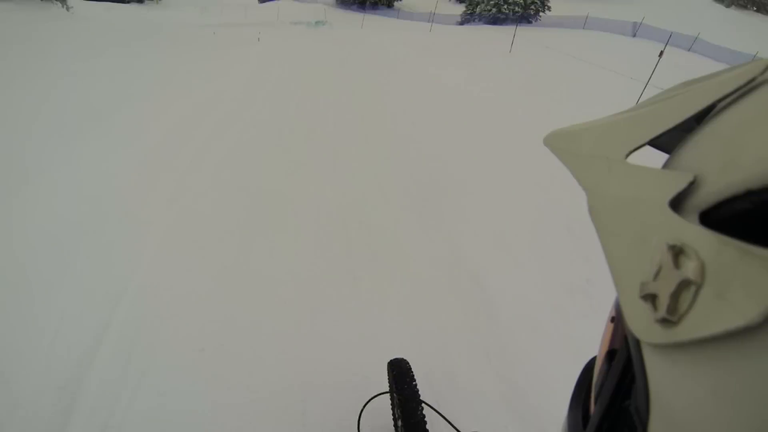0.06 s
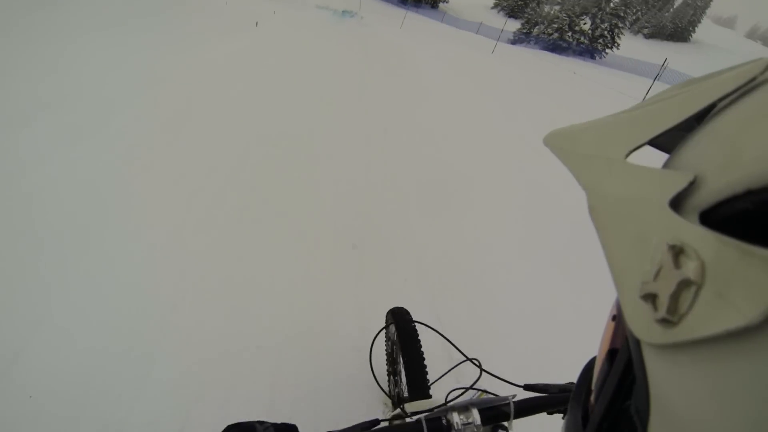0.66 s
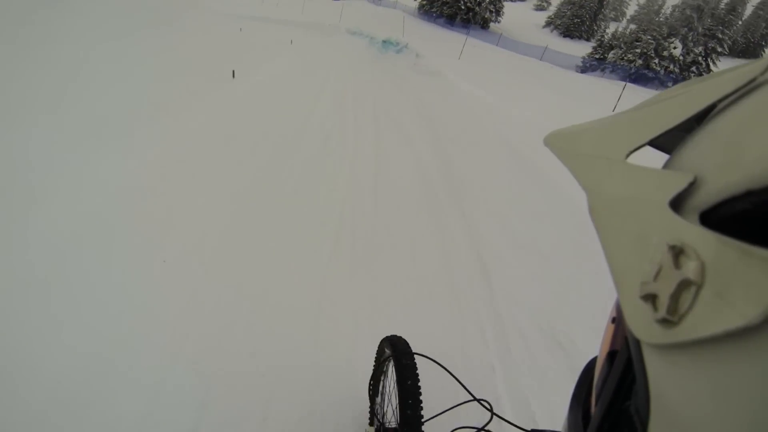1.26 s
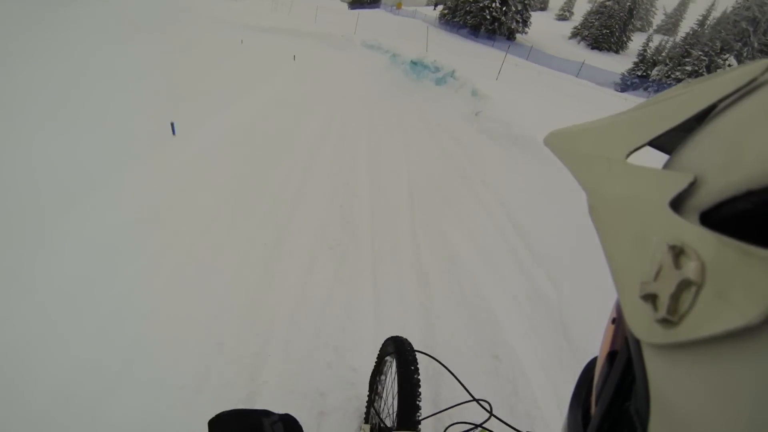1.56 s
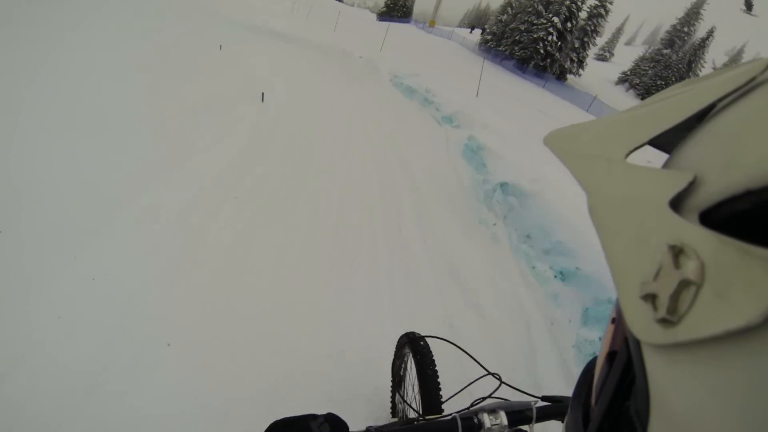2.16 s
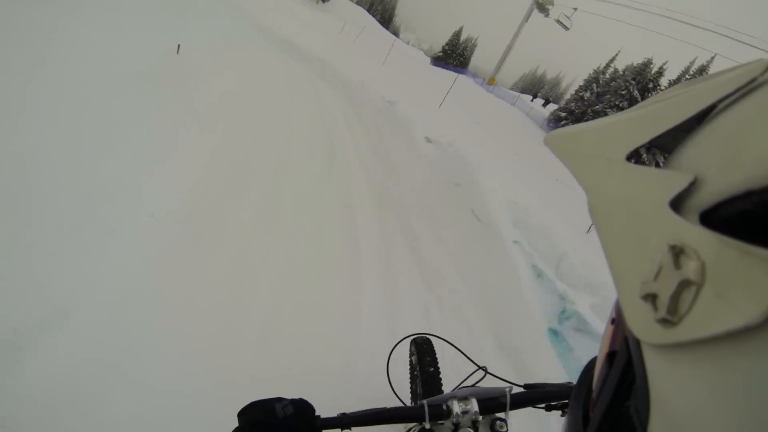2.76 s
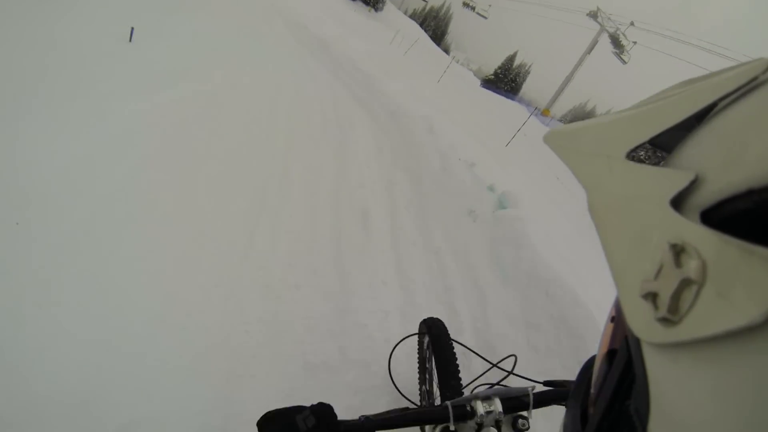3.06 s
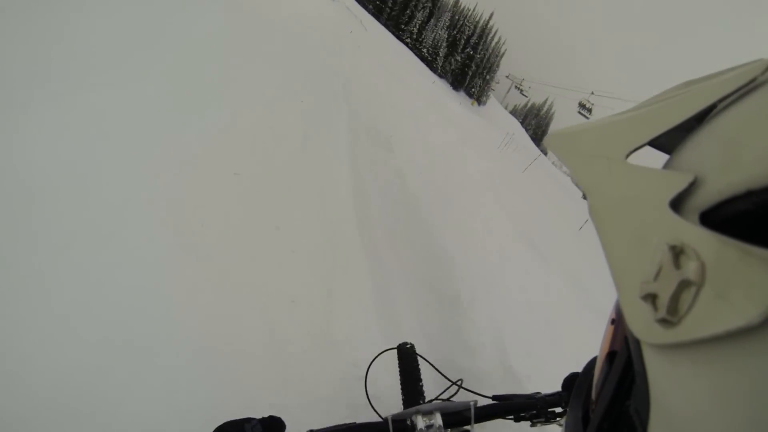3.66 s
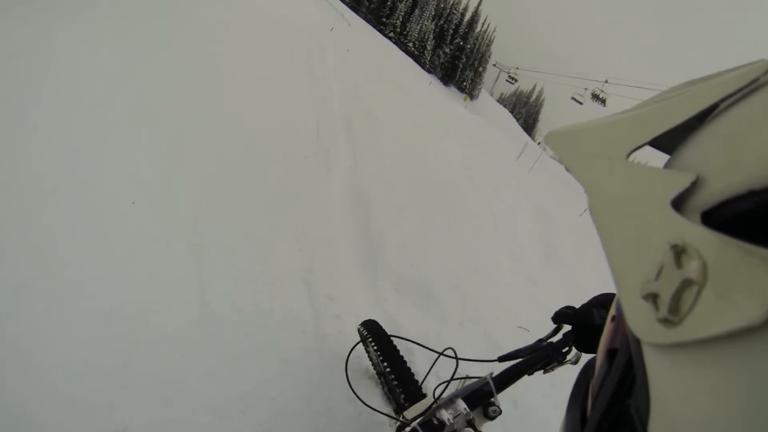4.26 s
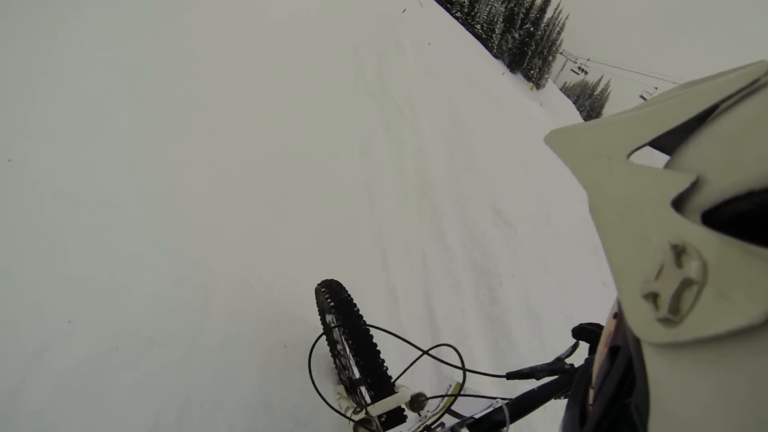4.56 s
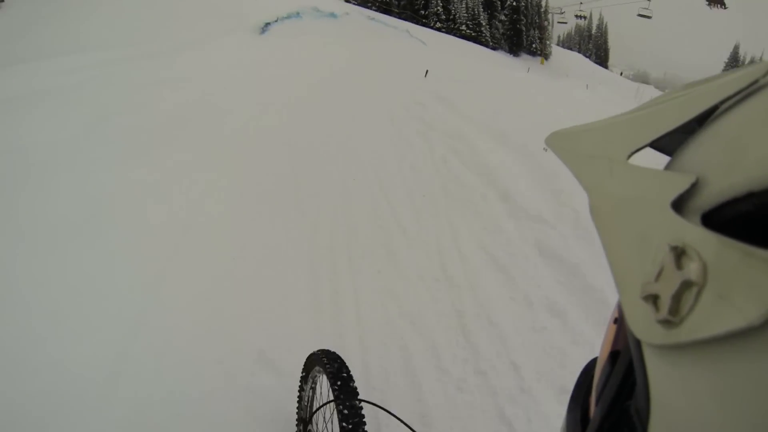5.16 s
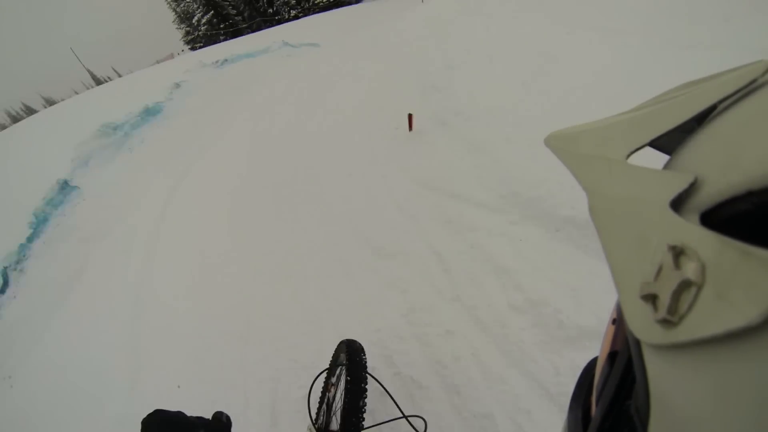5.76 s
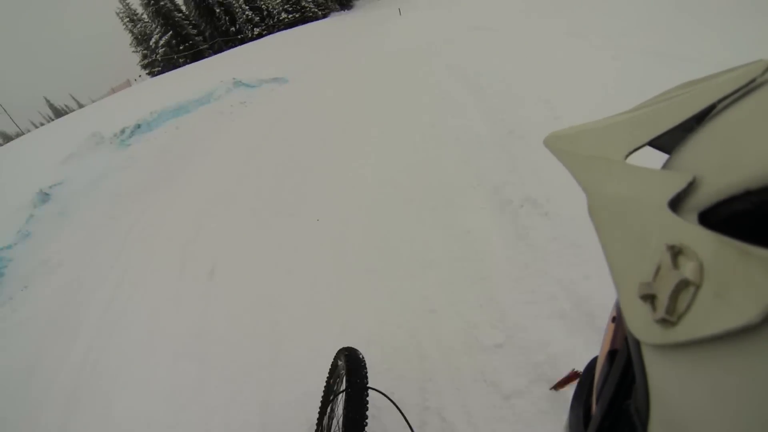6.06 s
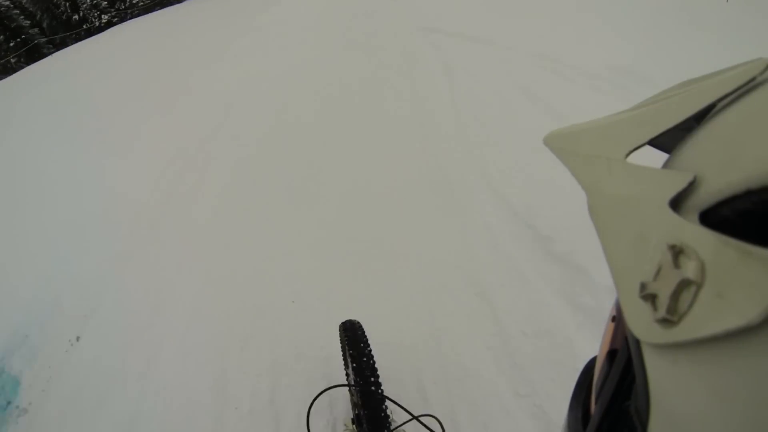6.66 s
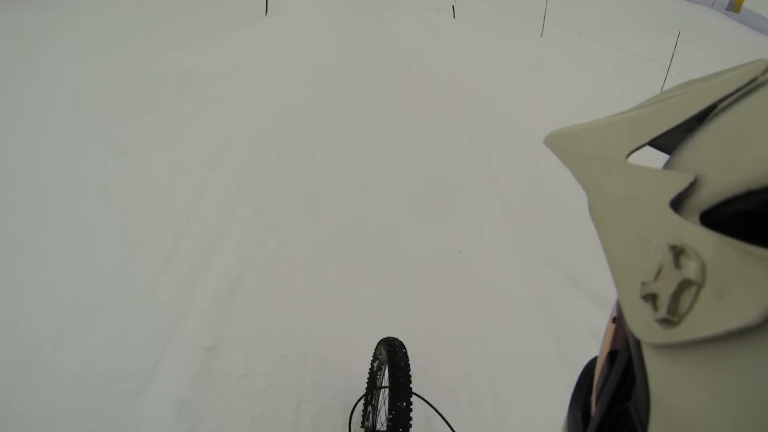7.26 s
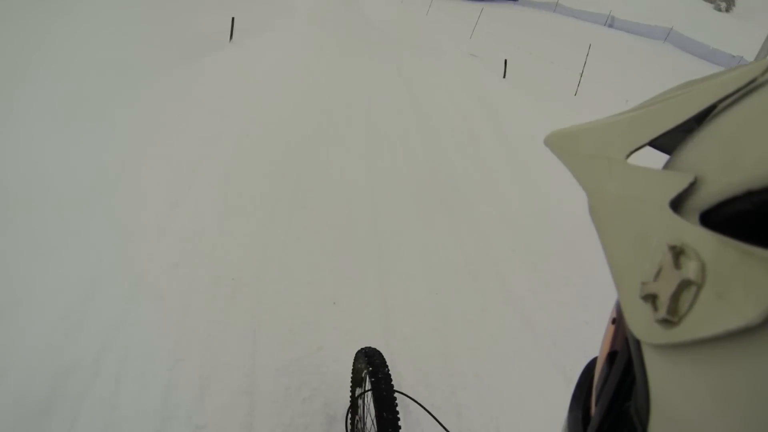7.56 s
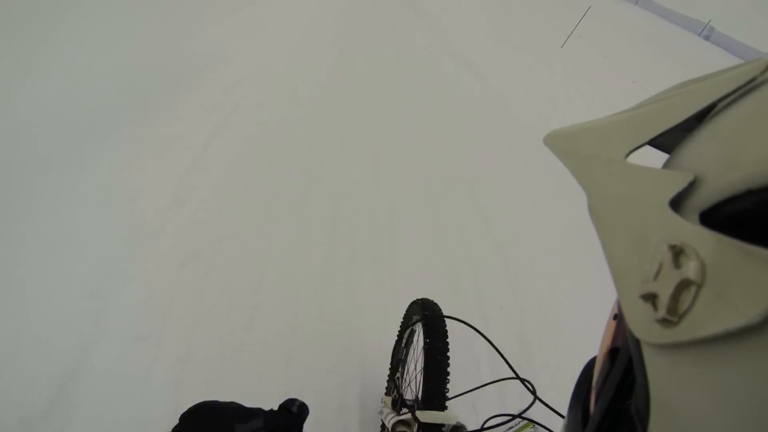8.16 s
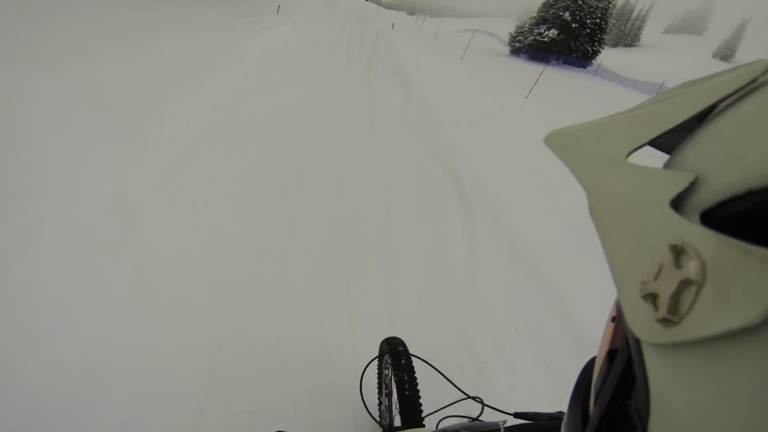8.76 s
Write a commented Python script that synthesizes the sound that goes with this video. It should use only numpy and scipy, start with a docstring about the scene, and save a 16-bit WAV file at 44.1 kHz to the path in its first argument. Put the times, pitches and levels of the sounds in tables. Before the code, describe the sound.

A mountain bike descends packed snow at speed, heard from a small camera case on the rider's helmet. Rushing air whirrs hollowly over tyre hiss and a deep, shaking rumble. Snow crumbs tick and knock close by through a long turn, and an ice chip cracks sharply. The wind eases, then one hard bump brings a low thud and a brief chain rattle before the rush builds again.

```python
"""Mountain bike on packed snow

A fast descent, heard from a microphone in a closed camera case on the rider's helmet.
Rushing air whirrs in the resonances of the case, the tyres hiss, and the helmet shakes with a deep rumble.
Snow ticks on the case, tyre knobs growl through a long turn, and a brake sings faintly.
About six seconds in, one hard bump makes the mount ring and the bike rattle."""
import sys
import numpy as np
from scipy import signal
from scipy.fft import rfft, irfft
from scipy.io import wavfile

SR = 44100
rng = np.random.default_rng(int(sys.argv[2]) if len(sys.argv) > 2 else 0)


def generate_wav(signal):
    """Clip the signal to [-1, 1] and save it as 16-bit WAV at the path in sys.argv[1]."""
    frames = np.transpose(np.atleast_2d(signal))
    scaled = np.clip(frames, -1, 1) * 32767
    pcm = np.round(scaled).astype(np.int16)
    wavfile.write(sys.argv[1], SR, pcm)


N = 388962
TIME = np.arange(N) / SR
FREQS = np.fft.rfftfreq(N, 1 / SR)


def gain_of(db):
    """Decibels to amplitude."""
    return 10 ** (np.asarray(db) / 20)


def unit_rms(x):
    """Scales to rms 1."""
    return x / np.sqrt(np.mean(x ** 2) + 1e-20)


def peaked(x, db):
    """Scales to a peak level."""
    return gain_of(db) * x / abs(x).max()


def level_curve(points):
    """Levels in dB, joined by lines in time."""
    return np.interp(TIME, *np.transpose(points))


def spectrum(points, resonances=()):
    """Gain at each frequency: dB points joined over log frequency, lifted by resonances."""
    point_hz, point_db = np.transpose(points)
    lift_db = sum(db / (1 + (2 * (FREQS - hz) / width) ** 2) for hz, width, db in resonances)
    return gain_of(np.interp(np.log(FREQS + 1), np.log(point_hz), point_db) + lift_db)


def noise(gain):
    """Random noise of rms 1 with the given spectrum."""
    return unit_rms(irfft(rfft(rng.standard_normal(N)) * gain, N))


def flutter(hz):
    """Random wavering of rms 1, mostly slower than the given rate."""
    return noise(1 / (1 + (FREQS / hz) ** 2))


def envelope(start_s, rise_s, hold_s, release_s):
    """Rises from 0 to 1, holds, and falls back."""
    age = TIME - start_s
    return np.clip(np.minimum(age / rise_s, 1 - (age - rise_s - hold_s) / release_s), 0, 1)


def decay(t, t60_s):
    """Falls by 60 dB in t60_s."""
    return np.exp(-np.log(1000) * t / t60_s)


def ring(modes, length_s=0.05):
    """Dying sines of a struck object."""
    t = TIME[:int(length_s * SR)]
    return sum(gain_of(db) * decay(t, t60) * np.sin(2 * np.pi * hz * t) for hz, db, t60 in modes)


def add(mix, start_s, sound):
    """Mixes a sound in at a time."""
    part = mix[round(start_s * SR):][:len(sound)]
    part += sound[:len(part)]


# Air speed over the helmet, heard as the strength of the whirr: time_s, level_db
AIRFLOW = [(0.01, -34.0), (0.93, -29.5), (1.04, -32.0), (1.26, -31.5), (1.42, -30.0), (2.4, -30.5),
           (2.48, -33), (3.1, -30.5), (4.25, -32.5), (4.5, -37), (4.96, -38), (5.29, -42.5), (5.49, -40.5),
           (6.0, -38), (6.08, -41.0), (6.79, -34.5), (6.87, -36), (7.72, -32), (7.8, -34.5), (8.82, -29)]
# Snow under the tyres, a rider's height below the microphone: time_s, level_db
TYRE_HISS = [(0.01, -47.0), (0.86, -40.5), (1.02, -41.5), (2.36, -38.5), (2.58, -40.5), (2.92, -37.0),
             (3.69, -41.5), (4.25, -41), (4.62, -47.5), (5.04, -49.0), (5.34, -54.5), (5.99, -51),
             (6.11, -55), (7.71, -43.0), (7.79, -47.5), (8.82, -38)]
# Air and tyres before the case colours them: frequency_hz, level_db
RUSH_SPECTRUM = [(300, -26), (700, -22), (1050, -12.5), (1250, -3.5), (1650, -4), (2000, -10),
                 (2280, -17.5), (3000, -13), (3650, -24), (4400, -26.5), (5300, -30), (5750, -32.5),
                 (9500, -42), (14000, -53.5), (15800, -72)]
# Case and helmet, right around the microphone: centre_hz, width_hz, lift_db
CASE_RESONANCES = [(184.6, 18, 8), (315.6, 54, 5), (466.4, 32, 9.5), (530, 32, 6.5), (808, 54, 10),
                   (1023, 43, 4.5), (1408, 245, 10), (2547, 280, 6), (3056, 860, 4), (3940, 260, 2.5),
                   (4844, 430, 7.5), (5376, 310, 8.5), (6000, 300, 4), (7840, 780, 2), (12100, 820, 0)]


def air_and_tyres(trim_db=0.5, split_hz=2250):
    """Turbulent air whirrs in the resonances of the case; tyre hiss takes over in the treble."""
    colour = spectrum(RUSH_SPECTRUM, CASE_RESONANCES)
    air_share = 1 / (1 + (FREQS / split_hz) ** 10)
    whirr = noise(colour * np.sqrt(air_share)) * gain_of(level_curve(AIRFLOW))
    hiss = noise(colour * np.sqrt(1 - air_share)) * gain_of(level_curve(TYRE_HISS))
    return gain_of(trim_db) * (whirr + hiss)


BANKED_TURN = envelope(start_s=2.14, rise_s=0.14, hold_s=2.4, release_s=1.3)


def buffet_strength_db(base_db=-42, cruise_db=-32.5, slope=0.88, turn_db=3):
    """Buffeting grows with air speed, and the long banked turn stirs up more."""
    return base_db + slope * (level_curve(AIRFLOW) - cruise_db) + turn_db * BANKED_TURN


# Low wind right against the case: frequency_hz, level_db
BUFFET_SPECTRUM = [(25, -6), (50, -12.5), (95, 3.5), (140, -1.5), (240, -3.5), (400, -7.5), (650, -13),
                   (950, -7), (1300, -29.5), (2500, -50)]


def buffeting(trim_db=-0.5, eddy_db=0.5):
    """Eddies beat on the case with a low, unsteady rumble."""
    rumble = noise(spectrum(BUFFET_SPECTRUM, CASE_RESONANCES))
    return rumble * gain_of(buffet_strength_db() + trim_db + eddy_db * flutter(30))


# Faint even hiss of the microphone itself: frequency_hz, level_db
MIC_HISS_SPECTRUM = [(1500, 2), (3000, 4.5), (4400, -7), (6500, -18), (9000, -14.5), (12500, -20.5),
                     (15500, -35)]


def microphone_hiss(level_db=-59.5):
    """The microphone's own noise, which shows when the tyres run quiet."""
    return gain_of(level_db) * noise(spectrum(MIC_HISS_SPECTRUM))


def tyre_contact(grip, skip_hz):
    """The tyres unload for a moment between ruts, which leaves short dips in the shaking."""
    return unit_rms(1 + np.tanh(grip + flutter(skip_hz)))


def swing(hz, wander_hz, jolt_hz=7):
    """A mode jolted by the uneven ground, so that its pace wanders."""
    pitch_hz = hz + wander_hz * flutter(jolt_hz)
    return np.sqrt(2) * np.sin(2 * np.pi * np.cumsum(pitch_hz) / SR)


# Roughness of the track, reaching the microphone through the rider: time_s, level_db
TRACK_ROUGHNESS = [(0.0, -20), (0.7, -30), (2.5, -27), (3.8, -20), (4.7, -23.5), (5.4, -22.5), (6.8, -23.5),
                   (8.2, -29.5), (8.82, -23.5)]
# Ruts in the track: start_s, helmet_rock_db, mount_hum_db
RUT_JOLTS = [(0.0, -23, -37), (0.9, -23, -38), (1.04, -44, -31.5), (1.64, -21, -46), (2.43, -22.5, -48),
             (2.8, -40, -32.5), (3.07, -15, -30), (3.21, -30, -29.5), (3.62, -14, -42), (3.71, -14.5, -45),
             (3.8, -15.5, -35), (4.26, -15.5, -38), (4.399, -12, -38), (4.64, -18.5, -43), (4.84, -15, -35),
             (5.79, -15.5, -60), (5.9, -16, -58), (6.19, -17.5, -42), (6.69, -25, -38), (7.02, -21, -48),
             (7.96, -17, -48), (8.73, -19.5, -42)]


def helmet_shake(sway_db=-2.5, lurch_db=-4, lurch_hz=26, mount_db=-4.5, jitter_db=0.5, rise_s=0.041):
    """Uneven snow rocks the helmet, buffeting keeps the camera mount humming, and each rut jolts both."""
    roughness = gain_of(level_curve(TRACK_ROUGHNESS))
    rock = tyre_contact(grip=0.98, skip_hz=14.2) * gain_of(sway_db) * roughness
    hum = tyre_contact(grip=1.3, skip_hz=13)
    hum *= gain_of(buffet_strength_db() + mount_db + jitter_db * flutter(12))
    for start_s, rock_db, hum_db in RUT_JOLTS:
        age = np.maximum(TIME - start_s, 0) / rise_s
        jolt = age * np.exp((1 - age ** 2) / 2)  # peaks at 1 and dies about as fast
        rock = np.hypot(rock, gain_of(rock_db) * jolt)
        hum = np.hypot(hum, gain_of(hum_db) * jolt)
    slow_pushes = noise(FREQS / (FREQS + 4) / (1 + (FREQS / lurch_hz) ** 4))
    lurch = gain_of(lurch_db) * roughness * slow_pushes
    return rock * swing(hz=30, wander_hz=3.97) + lurch + hum * swing(hz=74.8, wander_hz=3.17)


# The case wall, right beside the microphone: pitch_hz, relative_db, t60_s
CASE_WALL_MODES = [(1510, 2.5, 0.013), (2700, -6.5, .009), (4600, -7.5, 0.01), (8000, -4.5, 0.0023),
                   (8300, -2.5, 0.0018), (12170, 0.5, 0.0022), (14000, -4, .003)]


def case_strike(crunch_db=-3, crunch_t60_s=0.008, top_hz=11000):
    """The case wall rings while a crumb breaks up on it in a short crunch."""
    wall = ring(CASE_WALL_MODES)
    crunch = rng.standard_normal(len(wall)) * decay(TIME[:len(wall)], crunch_t60_s)
    return wall + gain_of(crunch_db) * signal.lfilter(*signal.butter(2, top_hz, fs=SR), crunch)


def snow_grains(relative_db=-23, spread_db=4, per_s=22):
    """Fine grains hit the case at random, harder in faster air."""
    sizes = gain_of(spread_db * np.minimum(rng.exponential(1, N), 3))
    arrivals = rng.random(N) < per_s / SR
    hits = sizes * arrivals * gain_of(level_curve(AIRFLOW))
    return signal.oaconvolve(hits, peaked(case_strike(), relative_db))[:N]


# Snow crumbs landing on the case, very close: start_s, level_db, pitch_hz, wall_to_spot_db
CRUMB_HITS = [(1.989, -32, 7750, -4), (2.030, -32, 6900, -3), (2.088, -30, 7920, -8),
              (2.211, -34, 7750, -10), (2.272, -32, 7240, -1), (2.317, -21.5, 7580, 5),
              (2.682, -31, 8600, -6), (2.769, -33, 6030, 2), (3.077, -28, 6370, -8),
              (3.254, -26, 7700, -18), (3.909, -37, 10680, -8), (3.966, -36, 10680, -10),
              (4.301, -31, 7200, -10), (4.477, -36, 10680, -6), (4.670, -29.5, 6000, 0),
              (5.283, -41, 7640, -10), (5.716, -33, 6240, -8), (5.817, -40, 8270, -3),
              (7.743, -33, 10500, 0), (7.931, -31, 7920, 8), (8.059, -30, 6030, 0), (8.509, -24, 12100, 3),
              (8.622, -36, 10500, -4), (8.679, -39, 10160, -5)]


def snow_crumbs(trim_db=1, spot_t60_s=0.0058):
    """The front tyre throws up crumbs; each rings the case wall and the spot that it hits."""
    out = np.zeros(N)
    for start_s, level_db, pitch_hz, wall_db in CRUMB_HITS:
        upper_hz = pitch_hz * rng.uniform(1.03, 1.1)
        spot = ring([(pitch_hz, 0, spot_t60_s), (upper_hz, -5, spot_t60_s / 2)])
        tick = spot + gain_of(wall_db) * case_strike()
        add(out, start_s, peaked(tick, level_db + trim_db))
    return out


# Clods landing on the helmet, close to the case: start_s, peak_db
CLOD_HITS = [(2.025, -15), (3.077, -14), (3.253, -15), (5.154, -21), (6.306, -23)]
# The helmet shell under the microphone: pitch_hz, relative_db, t60_s
SHELL_MODES = [(810, -39, 0.034), (1425, 3, 0.026), (1625, 14, 0.016), (2900, 2, .009)]


def snow_clods():
    """Clods of snow knock dully on the helmet."""
    out = np.zeros(N)
    for start_s, peak_db in CLOD_HITS:
        add(out, start_s, peaked(ring(SHELL_MODES), peak_db))
    return out


def tyre_growl(centre_hz=171, width_hz=73, level_db=-47):
    """Leaning into the turn, the tyre knobs bite and add a low rough drone."""
    drone = noise(1 / (1 + (2 * (FREQS - centre_hz) / width_hz) ** 2))
    return gain_of(level_db) * BANKED_TURN * drone


def brake_song(pitch_hz=3960, level_db=-56.5, octave_db=-8, waver=0.0049, chatter_db=3):
    """A pad brushes the disc: a thin wavering note and its octave."""
    phase = 2 * np.pi * np.cumsum(pitch_hz * (1 + waver * flutter(120))) / SR
    note = np.sin(phase) + gain_of(octave_db) * np.sin(2 * phase)
    touch = envelope(start_s=3.49, rise_s=0.04, hold_s=0.14, release_s=0.4)
    return touch * note * gain_of(level_db + chatter_db * flutter(25))


def ice_chip(start_s=4.3605, peak_db=-7):
    """One hard chip of ice cracks against the case."""
    out = np.zeros(N)
    add(out, start_s, peaked(case_strike(), peak_db))
    return out


# Bright scrape and clatter from the bike below, heard in the case: frequency_hz, level_db
BIKE_SPECTRUM = [(1500, -19), (3200, 7.5), (4300, -2), (7500, -11), (9500, -16), (12000, -23), (15000, -36)]


def tyre_scrape(level_db=-54.5):
    """The tyres scrape as they press into a dip."""
    pressure = envelope(start_s=5.83, rise_s=0.13, hold_s=0.02, release_s=0.04)
    return gain_of(level_db) * pressure * noise(spectrum(BIKE_SPECTRUM))


# The camera mount, ringing straight into the case: pitch_hz, level_db, t60_s
MOUNT_MODES = [(72.9, -17, 0.97), (175, -33, 0.26), (310, -47, .12)]


def bump(start_s=5.971, length_s=0.135, swing_hz=25.3, swing_db=-3,
         thud_s=6.009, thud_db=-29, thud_hz=330, thud_t60_s=0.2, ring_s=5.998):
    """The bike bottoms into the dip: a few big swings, a dull thud, and the mount rings on."""
    out = np.zeros(N)
    t = TIME[:int(length_s * SR)]
    swings = signal.windows.tukey(len(t), 0.6) * np.sin(2 * np.pi * swing_hz * t)
    add(out, start_s, -gain_of(swing_db) * swings)
    thud = noise(1 / (1 + (FREQS / thud_hz) ** 2) ** 1.2)[:len(t)]
    thud *= (1 - np.exp(-t * thud_hz / 2)) * decay(t, thud_t60_s)
    add(out, thud_s, gain_of(thud_db) * thud)
    ringing = ring(MOUNT_MODES, length_s=1)
    cushion = 1 - np.exp(-TIME[:len(ringing)] / 0.011)  # the tyres soften the blow
    add(out, ring_s, ringing * cushion)
    return out


# Chain and cables, down on the frame, just after the bump: start_s, peak_db, t60_s
CHAIN_SLAPS = [(6.018, -39, .04), (6.062, -34, .02), (6.070, -44, .015), (6.116, -33.5, 0.026),
               (6.12, -32.5, .025)]
# Their rattling metal: centre_hz, width_hz, lift_db
METAL_RESONANCES = [(3380, 200, 13.5), (5000, 250, 8), (5670, 250, 15), (7150, 500, 9), (8500, 600, 4)]


def chain_rattle(settle_s=6.15, gap_s=0.038, count=5, bounce_db=-40.5, loss_db=0.5, bounce_t60_s=0.018):
    """Chain and cables slap in short bright bursts; then the chain settles in even bounces."""
    out = np.zeros(N)
    t = TIME[:SR // 10]
    clatter = noise(spectrum(BIKE_SPECTRUM, METAL_RESONANCES))
    bounces = [(settle_s + k * gap_s, bounce_db - k * loss_db, bounce_t60_s) for k in range(count)]
    for start_s, peak_db, t60_s in CHAIN_SLAPS + bounces:
        burst = np.minimum(t / 0.00071, 1) * decay(t, t60_s)
        slap = clatter[round(start_s * SR):][:len(t)] * burst
        add(out, start_s, peaked(slap, peak_db))
    return out


def scene(gust_db=0.91):
    """Everything reaches one microphone inside the case; gusts flutter the rush and the buffeting."""
    wind = (air_and_tyres() + buffeting()) * gain_of(gust_db * flutter(30))
    ride = wind + microphone_hiss() + helmet_shake()
    dip = bump() + tyre_scrape() + chain_rattle()
    spray = ice_chip() + snow_crumbs() + snow_clods() + snow_grains()
    return (ride + dip + spray + brake_song() + tyre_growl())[None]


def record(dry):
    """The recorder cuts off the treble above 15.5 kHz."""
    lowpass = signal.firwin(511, 15500, window=("kaiser", 9), fs=SR)
    return signal.oaconvolve(dry, lowpass[None], "same")


dry = scene()
out = record(dry)
generate_wav(out)
```